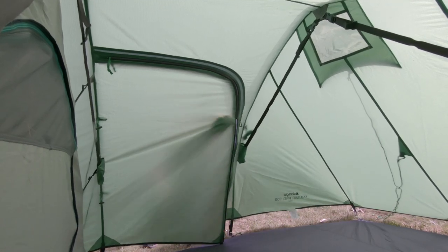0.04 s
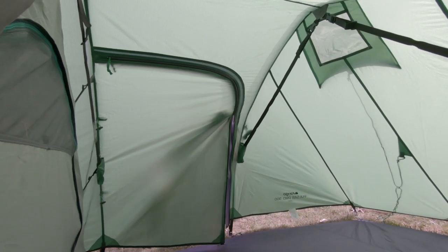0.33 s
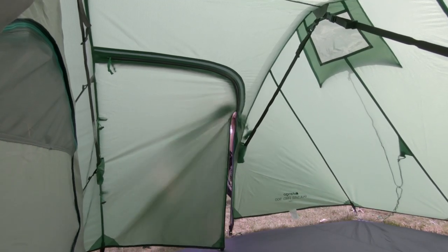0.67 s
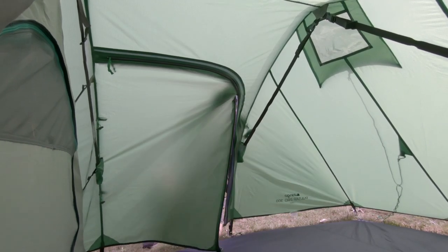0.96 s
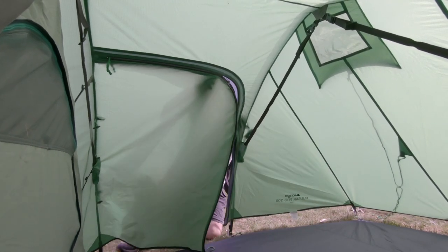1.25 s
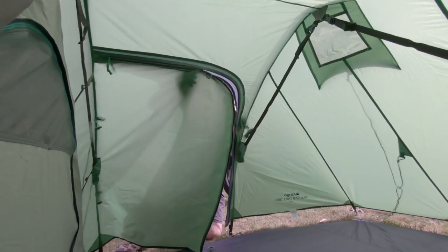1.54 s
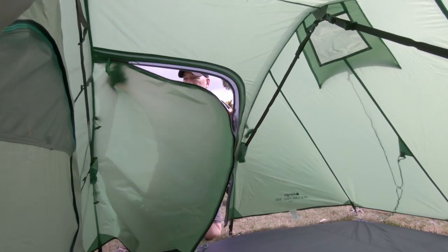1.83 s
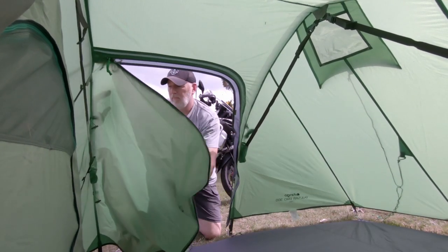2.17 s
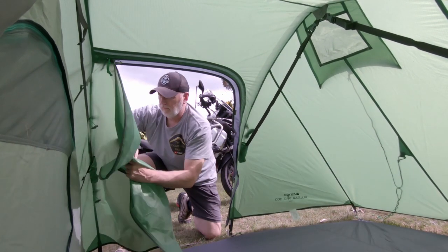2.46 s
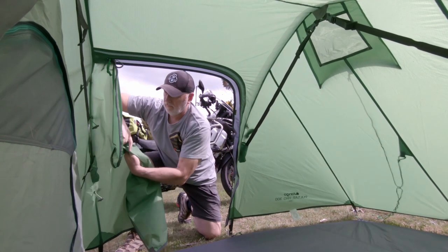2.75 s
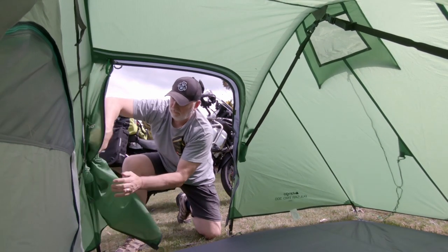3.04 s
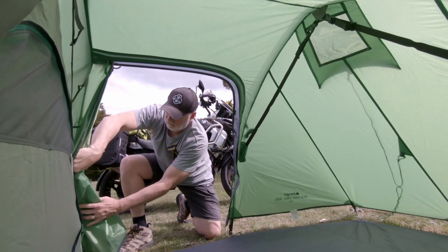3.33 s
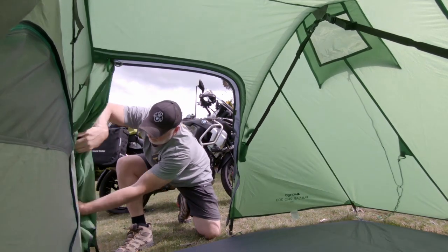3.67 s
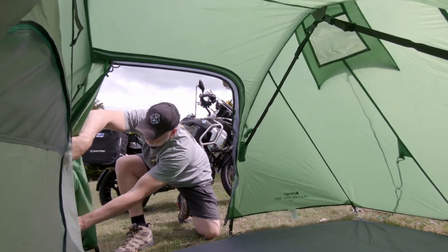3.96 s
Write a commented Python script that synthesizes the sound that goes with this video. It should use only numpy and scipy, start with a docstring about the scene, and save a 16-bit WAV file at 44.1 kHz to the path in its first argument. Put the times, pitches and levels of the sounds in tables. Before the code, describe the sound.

A tent door zipper is pulled open in three buzzing strokes, heard from inside the tent. The loose nylon then swishes, crinkles and flaps as it is gathered aside, with light wind and a faint, distant bird.

```python
"""Unzipping a tent door

From inside a tent, the door is unzipped in three pulls: the slider ticks over the teeth, and the tight panel
sounds them like a drumskin. The slider's metal tab clinks now and then, and the slider knocks against its end
stop. The loose nylon is then gathered aside: it swishes, crinkles, snaps and flaps. Light wind stirs the tent
throughout, and a distant bird sings a short phrase."""
import sys
import numpy as np
from scipy import signal
from scipy.fft import rfft, irfft, next_fast_len
from scipy.io import wavfile
from scipy.ndimage import uniform_filter1d, map_coordinates

SR = 44100
rng = np.random.default_rng(int(sys.argv[2]) if len(sys.argv) > 2 else 0)


def log_audio(samples):
    """Write samples as a 16-bit WAV file to the path given in sys.argv[1]."""
    # one column per channel
    frames = np.atleast_2d(samples).T
    # limit to full scale, then quantise
    limited = np.clip(frames, -1, 1)
    pcm = np.round(limited * 32767).astype(np.int16)
    wavfile.write(sys.argv[1], SR, pcm)


N = 176400

# how alike the left and right sides sound (frequency [Hz], likeness [-1 to 1])
LIKENESS = [(60, 0.79), (400, 0.84), (1100, 0.55), (2200, 0.61), (4000, 0.86), (8000, -.15)]
# A colour says how strong the low and high parts of a sound are.
# colours of the billowing tent and the outdoor air (frequency [Hz], level [dB])
WIND_COLOUR = [(15, -13), (60, 6), (100, -7), (180, -10.5), (300, -23.5), (700, -47.5)]
AIR_COLOUR = [(200, -4), (400, -15), (3500, -20), (9000, -20.5), (15000, -55)]
# the bird's notes (start [s], length [s], first pitch [Hz], middle pitch [Hz], last pitch [Hz])
BIRD_NOTES = [(2.096, 0.065, 2070, 2500, 2400), (2.299, 0.096, 2900, 1970, 1740),
              (2.744, 0.087, 2260, 1494, 1400), (2.893, 0.06, 2540, 2850, 2600),
              (3.034, 0.054, 2610, 2720, 1950), (3.172, 0.034, 2600, 2740, 2170)]

# flaps of the door panel (time [s], level [dB], swing rate [Hz])
FLAPS = [(1.263, -18.5, 59), (1.447, -18, 155), (1.933, -19, 126), (2.142, -26, 49), (2.546, -15, 134),
         (3.191, -30.5, 75.6), (3.585, -25, 52), (3.665, -26, 112), (3.771, -21.5, 59), (3.858, -24, 123)]
# colours of a flap's puff of air, tight nylon and slack nylon (frequency [Hz], level [dB])
PUFF_COLOUR = [(200, 12.5), (1100, -3.5), (15000, -52)]
TIGHT_COLOUR = [(250, -14.5), (600, -6.5), (1100, -11), (1550, -3), (4000, 0), (6000, -8), (8500, -6.5),
                (13000, -23.5), (15500, -37)]
SLACK_COLOUR = [(200, -9.5), (450, -14), (1300, -8), (3000, -3), (4600, -8.5), (6800, -15.5), (8500, -12.5),
                (10500, -22.5), (13000, -26), (15500, -47)]
# swishes of tugged, then gathered nylon (peak time [s], level [dB], rise [s], fall [s])
TUGS = [(.185, -41, 0.1, 0.072), (.305, -38.5, 0.081, 0.052), (.44, -40, 0.091, 0.045),
        (.535, -39.5, 0.027, 0.071), (.585, -33, 0.01, 0.026), (.63, -25, 0.0042, 0.036),
        (.692, -21.5, 0.058, 0.027)]
GATHERS = [(2.0, -44, 0.06, 0.11), (2.162, -37.5, 0.0056, 0.55), (2.38, -33.5, 0.069, 0.082),
           (2.55, -26.5, 0.12, 0.14), (2.74, -36.5, 0.093, 0.14), (2.858, -33, 0.031, 0.057),
           (2.98, -33.5, 0.24, 0.11), (3.33, -36.5, 0.35, 0.13), (3.41, -31.5, 0.041, 0.05),
           (3.63, -33, 0.43, 0.9), (3.85, -31, 0.13, 0.08)]
# faint stirring of loose cloth (time [s], level [dB])
STIRRING = [(.68, -64), (.78, -41), (.9, -48), (1.4, -48.5), (2.1, -54), (4, -36.5)]
# creases snapping (time [s], level [dB])
SNAPS = [(0.5036, -29), (0.581, -31), (0.6265, -34), (0.902, -30.5), (.926, -28.5), (2.1774, -19),
         (2.3065, -25), (2.548, -17.5), (2.593, -23), (2.8502, -19.5), (3.4022, -24)]
# clinks of the metal tab, and at 1.933 s the slider knocking against its end stop (time [s], level [dB])
CLINKS = [(0.626, -17), (1.933, -21), (2.7084, -12.5), (2.7657, -23)]
# tones the metal rings with (frequency [Hz], level [dB])
CLINK_TONES = [(2900, -16), (3500, -0.5), (4500, -11), (8280, -13)]

# slider speed, one list for each pull (time [s], speed [teeth per s])
PULL_SPEEDS = [
    [(.705, 330), (.728, 705), (.752, 910), (.778, 510), (.80, 433), (.825, 330)],
    [(.942, 123), (1.015, 149), (1.035, 310), (1.055, 360), (1.078, 570), (1.1, 473), (1.133, 415),
     (1.15, 470), (1.18, 300), (1.21, 410), (1.315, 365), (1.36, 138), (1.412, 150)],
    [(1.436, 127), (1.465, 165), (1.49, 260), (1.592, 400), (1.64, 256), (1.675, 372), (1.733, 860),
     (1.768, 850), (1.85, 698), (1.878, 740), (1.935, 890)],
]
# ticking of the teeth in each pull (time [s], level [dB])
TICK_1 = [(0.715, -35), (0.765, -30), (0.825, -44.5)]
TICK_2 = [(0.945, -37.5), (1.26, -29), (1.412, -46)]
TICK_3 = [(1.44, -35), (1.736, -26.5), (1.93, -33)]
# buzzing of the panel in each pull (time [s], level [dB])
BUZZ_1 = [(0.705, -47), (0.729, -26.5), (0.825, -40.5)]
BUZZ_2 = [(0.947, -35.5), (1.02, -32.5), (1.075, -25), (1.19, -35.5), (1.412, -44.5)]
BUZZ_3 = [(1.44, -35.5), (1.735, -26), (1.93, -35)]
# the slider bites harder or eases off (time [s], level change [dB], half-length [s])
BITES = [(1.003, -6, 0.015), (1.167, -3, 0.026), (1.245, 0.5, 0.0064), (1.336, 4, 0.01), (1.409, -5, 0.03),
         (1.59, 4.5, 0.0086)]
# colours of the ticks, corner ticks, panel buzz and high sizzle (frequency [Hz], level [dB])
TICK_COLOUR = [(400, -30), (1050, -3), (1900, 2), (2700, -0.5), (3800, -1), (4900, -10), (5900, -18),
               (8400, -14.5), (14000, -47)]
CORNER_COLOUR = [(400, -34), (1500, -7.5), (3650, 3), (4800, -5.5), (5700, -15.5), (8400, -20),
                 (14000, -56)]
BUZZ_COLOUR = [(110, -18), (300, -7.5), (460, 8), (850, 2), (1700, -10.5), (4000, -76), (14000, -107)]
SIZZLE_COLOUR = [(2500, -18), (6000, 1.5), (8400, -3), (10500, -6.5), (13000, -15), (15500, -37)]
# how much corner colour brightens the ticks as the slider rounds the top (time [s], share [0 to 1])
CORNER_SHARE = [(1.2, 0), (1.3, .9), (1.52, 0.44), (1.76, 0.37)]

STEADY_SPEED = 536  # teeth per s; any slower and the slider catches and runs unevenly
TIME = np.arange(N) / SR  # seconds at each sample


def amp(db):
    """Turn decibels into a number to multiply a sound by."""
    return 10 ** (np.asarray(db) / 20)


def unit(x):
    """Scale a sound so that its average power is 1."""
    return x / np.sqrt(np.mean(x ** 2) + 1e-20)


def along(points, hz):
    """Read between (frequency, value) points, with octaves evenly spaced."""
    frequencies, values = np.transpose(points)
    return np.interp(np.log(hz + 1), np.log(frequencies + 1), values)


def curve(rows):
    """Join (time, value) points with straight lines, one value per sample."""
    return np.interp(TIME, *np.transpose(rows))


def wobble(per_s):
    """A smooth curve through per_s random values each second."""
    return map_coordinates(rng.standard_normal(int(N * per_s / SR) + 4), [TIME * per_s])


def filtered(x, response):
    """Multiply each frequency in a sound by response(hz)."""
    size = next_fast_len(N + SR // 4)
    return irfft(rfft(x, size) * response(np.fft.rfftfreq(size, 1 / SR)), size)[..., :N]


def coloured(x, colour):
    """Give a sound a colour, with a filter that rings only after each click."""
    size = 8192
    cepstrum = irfft(np.log(amp(along(colour, np.fft.rfftfreq(size, 1 / SR)))))
    cepstrum[1:size // 2] *= 2  # these two lines move early ringing to after the click
    cepstrum[size // 2 + 1:] = 0
    ring = irfft(np.exp(rfft(cepstrum)))[:size // 2]
    return filtered(x, lambda hz: rfft(ring, next_fast_len(N + SR // 4)))


def spread(pair):
    """Share two unrelated sounds between left and right: lows alike, highs wide."""
    angle = lambda hz: np.arccos(np.clip(along(LIKENESS, hz), -1, 1)) / 2
    mid, side = filtered(pair, lambda hz: np.array([np.cos(angle(hz)), np.sin(angle(hz))]))
    return np.array([mid + side, mid - side])


def noise(colour, gate=1):
    """Stereo noise of power 1, chopped by the gate and then coloured."""
    return unit(spread(coloured(gate * rng.standard_normal((2, N)), colour)))


def steady(x):
    """Even out slow changes in level, so the power stays near 1."""
    power = np.abs(uniform_filter1d(np.mean(np.atleast_2d(x) ** 2, axis=0), size=700))
    return x / np.sqrt(power + power.max() / 10 ** 4)


def add(track, start, sound):
    """Mix a sound into a track at a start time in seconds."""
    part = track[..., max(round(start * SR), 0):][..., :sound.shape[-1]]
    part += sound[..., :part.shape[-1]]


def fade(t, fade_s):
    """Die away, dropping 60 dB in fade_s seconds."""
    return amp(-60 * t / fade_s)


def tent(x, walls_db=0.5, delay_s=0.003):
    """A sound plus its brief scatter from the cloth walls, in stereo."""
    t = TIME[:SR // 8]
    tail = rng.standard_normal((2, len(t))) * fade(t, 0.045) * (t > delay_s)
    tail /= np.linalg.norm(tail[0])
    walls = amp(walls_db) * signal.fftconvolve(x[None], tail, axes=1)[:, :N]
    return spread(np.array([x + walls[0], 1.31 * walls[1]]))


def wind(rumble_db=-43.5, air_db=-51):
    """The tent billows with a low rumble over faint outdoor air."""
    gusts_db = curve([(0, -5.5), (0.7, 1)]) + 3.04 * wobble(9.6)
    return amp(rumble_db + gusts_db) * noise(WIND_COLOUR) + amp(air_db) * noise(AIR_COLOUR)


def bird(level_db=-38, waver=0.024):
    """A bird outside whistles one phrase of arched and falling notes."""
    song = np.zeros(N)
    for start, length, *pitches in BIRD_NOTES:
        progress = np.linspace(0, 1, int(length * SR))
        hz = np.polyval(np.polyfit([0, 0.5, 1], pitches, 2), progress)
        hz *= 1 + waver * wobble(1220)[:len(hz)]
        level = hz / 2800 * np.sqrt(np.abs(np.sin(np.pi * progress)))  # lower notes are softer
        add(song, start, level * np.sin(2 * np.pi * np.cumsum(hz) / SR))
    return amp(level_db) * song


def flaps(fade_swings=9, attack_s=0.0036, puff_db=-2.5):
    """The panel jerks and shoves the air: a low, fading swing and a puff."""
    swings, puffs, t = np.zeros(N), np.zeros(N), TIME[:SR // 2]
    for start, db, hz in FLAPS:
        level = amp(db) * fade(t, fade_swings / hz) * (1 - np.exp(-t / attack_s))
        add(swings, start, level * np.sin(2 * np.pi * hz * t))
        add(puffs, start, level * hz / 158)  # quicker flaps puff harder
    return swings + amp(puff_db) * puffs * noise(PUFF_COLOUR)


def swells(rows, drop_db=14.5, roundness=1.36):
    """Each hand movement swells up and dies away; their powers add."""
    power = np.zeros(N)
    for peak, db, rise, fall in rows:
        distance = np.abs(TIME - peak) / np.where(TIME < peak, rise, fall)
        power += amp(db - drop_db * distance ** roundness) ** 2
    return np.sqrt(power)


def rustle(level, colour, crinkles_per_s=900, swish_db=-3, crinkle_db=-4.5):
    """Nylon rubs: a swish full of tiny crinkles of random size."""
    hits = rng.random(N) < crinkles_per_s / SR
    sizes_db = 4.5 * np.minimum(rng.exponential(size=N), 4)
    clicks = hits * amp(sizes_db) * rng.choice([-1, 1], N)
    crinkles = unit(coloured(tent(clicks), colour))
    flicker = amp(1.23 * wobble(70))
    return level * flicker * (amp(swish_db) * noise(colour) + amp(crinkle_db) * crinkles)


def cloth():
    """Tight cloth hisses brightly under the first tugs; slack cloth is duller."""
    slack_level = np.hypot(swells(GATHERS), amp(curve(STIRRING)))
    return rustle(swells(TUGS), TIGHT_COLOUR) + rustle(slack_level, SLACK_COLOUR)


def snaps(crack_db=-11.5, ring_db=4):
    """Creases pop through: each gives a crack with a very short ring."""
    cracks, rings, t = np.zeros(N), np.zeros(N), TIME[:SR // 20]
    hiss = unit(coloured(rng.standard_normal(N), SLACK_COLOUR))
    for start, db in SNAPS:
        hz = 2250 * 2 ** rng.uniform(-0.75, 0.63)
        add(cracks, start, amp(db + crack_db) * fade(t, 0.024))
        add(rings, start, amp(db + ring_db) * fade(t, 0.0044) * np.sin(2 * np.pi * hz * t))
    return tent(cracks * hiss + rings)


def metal_clinks(crack_db=-17):
    """Metal strikes metal, the tab on the slider or the slider on its end stop: a bright crack and a very short
    ring."""
    rings, cracks, t = np.zeros(N), np.zeros(N), TIME[:SR // 20]
    ring = fade(t, 0.011) * sum(amp(db) * np.sin(2 * np.pi * hz * t) for hz, db in CLINK_TONES)
    for start, db in CLINKS:
        add(rings, start, amp(db) * ring)
        add(cracks, start, amp(db + crack_db) * fade(t, 0.035))
    return tent(rings, walls_db=-6) + cracks * noise(SIZZLE_COLOUR)


def panel_boom(clicks, own_hz=145, width_hz=39, dull_hz=935, level_db=-33.5):
    """Each tooth pushes the panel, which booms when slow teeth match its own pitch."""
    resonance = lambda hz: 1j * hz * width_hz / (own_hz ** 2 - hz ** 2 + 1j * hz * width_hz)
    boom = filtered(clicks, resonance) * SR / own_hz
    return amp(level_db) * filtered(boom, lambda hz: 1 / (1 + 1j * hz / dull_hz) ** 2)


def coil(clicks, travel_s=0.002003):
    """Clicks run along the zip's stiff coil, highs first; travel_s is the trip at 1000 Hz."""
    centred = clicks - uniform_filter1d(clicks, size=500)
    return filtered(centred, lambda hz: np.exp(-4j * np.pi * travel_s * np.sqrt(hz * 1000)))


def tooth_clicks(teeth_passed, speed, jitter_s=0.00006, scatter_db=1):
    """One click for each tooth; slow teeth are less even in timing and strength."""
    at = np.interp(np.arange(1, int(teeth_passed[-1]) + 1), teeth_passed, np.arange(N))
    chance = rng.standard_normal((len(at), 2))
    uneven = np.minimum(STEADY_SPEED / speed[at.astype(int)], 2)
    at += jitter_s * SR * uneven * chance[:, 0]
    sizes = amp(scatter_db * uneven[:, None] * chance[:, 1:])
    # a click can fall between samples, so it is drawn over the 20 around it
    nearby = at.astype(int)[:, None] + np.arange(-10, 10)
    offset = nearby - at[:, None]
    shapes = np.sinc(offset) * np.sinc(offset / 10)
    return np.bincount(nearby.ravel(), (sizes * shapes).ravel(), N)


def slider_tone(x):
    """The slider's colour, which turns brighter as it rounds the top of the door."""
    corner = curve(CORNER_SHARE)
    return steady((1 - corner) * coloured(x, TICK_COLOUR) + corner * coloured(x, CORNER_COLOUR))


def slider_ticks(clicks, puffs, speed, stutter_db=1.2):
    """Each tooth ticks, scrapes and sizzles; fast teeth sound cleaner and brighter."""
    octaves = np.log2(speed / STEADY_SPEED)
    scrape = amp(-7 - 3 * np.maximum(octaves, -1)) * slider_tone(spread(puffs * rng.standard_normal((2, N))))
    sizzle = amp(-14 + 5 * octaves) * steady(noise(SIZZLE_COLOUR, puffs))
    return (slider_tone(clicks) + scrape + sizzle) * amp(stutter_db * wobble(70))


def zip_pull(speeds, tick_levels, buzz_levels, waver=0.025):
    """One pull drags the slider over the teeth: they tick, and the panel buzzes and booms."""
    moving = (TIME > speeds[0][0]) & (TIME < speeds[-1][0])
    speed = curve(speeds)
    speed *= 1 + waver * np.minimum(STEADY_SPEED / speed, 2) ** 2 * wobble(150)
    teeth_passed = np.cumsum(speed * moving) / SR + 0.5
    clicks = tooth_clicks(teeth_passed, speed)
    smeared = tent(coil(clicks))
    puffs = moving * np.exp(-3 * (teeth_passed % 1))  # jumps up at each tooth, then fades
    ticks = slider_ticks(smeared, puffs, speed) * amp(curve(tick_levels))
    buzz = steady(coloured(smeared, BUZZ_COLOUR)) * amp(curve(buzz_levels))
    gate = uniform_filter1d(moving.astype(float), size=200)
    bites_db = sum(db * np.exp(-((TIME - at) / half) ** 2) for at, db, half in BITES)
    return gate * amp(bites_db) * (ticks + buzz) + panel_boom(clicks)


def scene():
    """Mix it all; the door's sounds drift from slightly right to slightly left as it opens."""
    pulls = zip(PULL_SPEEDS, [TICK_1, TICK_2, TICK_3], [BUZZ_1, BUZZ_2, BUZZ_3])
    zipper = sum(zip_pull(*pull) for pull in pulls)
    left = np.array([[1], [-1]])  # turns the left side up and the right side down
    drift_db = curve([(1, -0.87), (2, 0.68)])
    door = (zipper + cloth() + snaps() + metal_clinks()) * amp(left * drift_db)
    return door + (flaps() + wind()) * amp(left * 0.69) + bird()


def record(dry):
    """Cut away everything above 15600 Hz."""
    return filtered(dry, lambda hz: hz < 15600)


dry = scene()
out = record(dry)
log_audio(out)
```